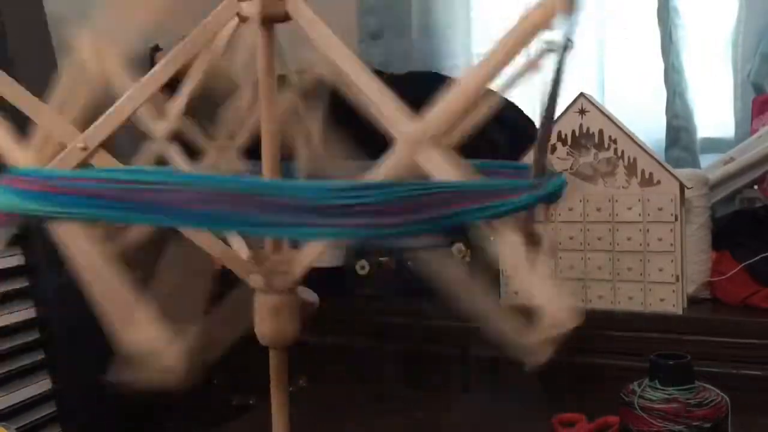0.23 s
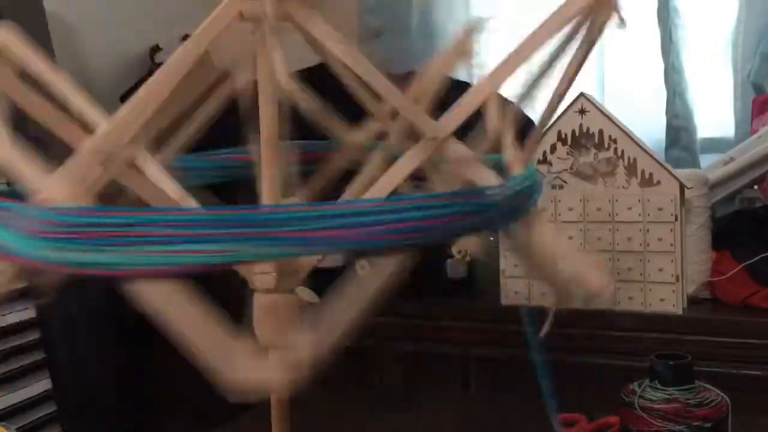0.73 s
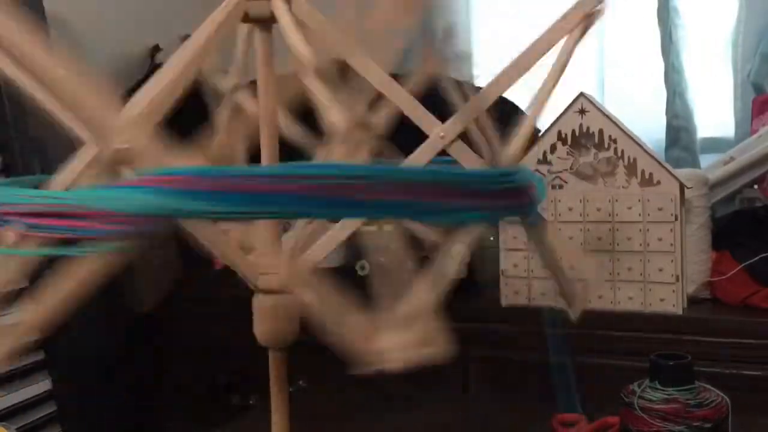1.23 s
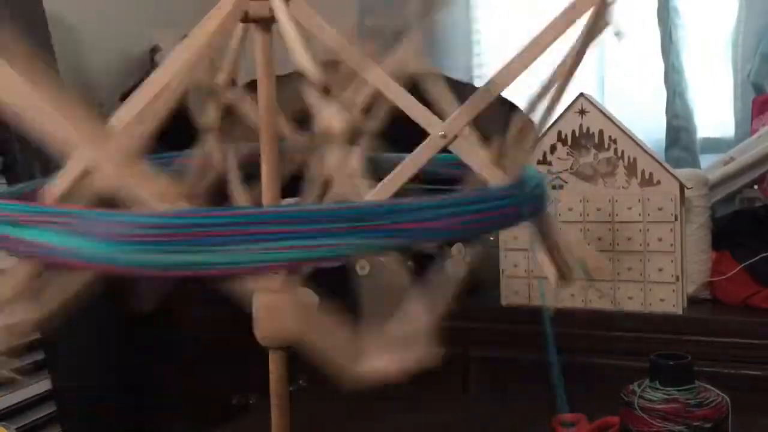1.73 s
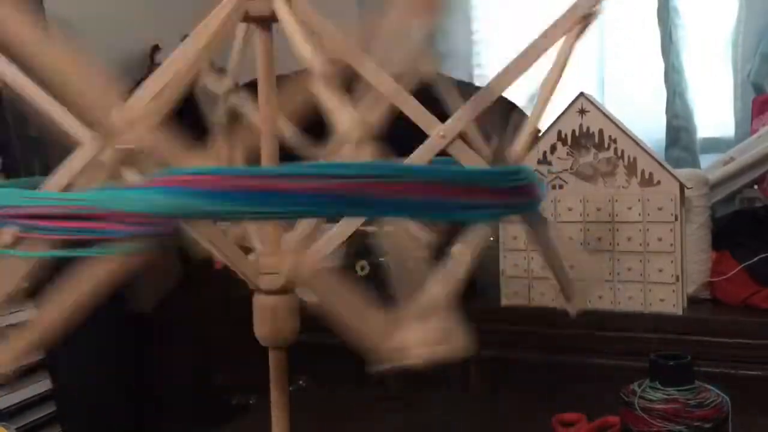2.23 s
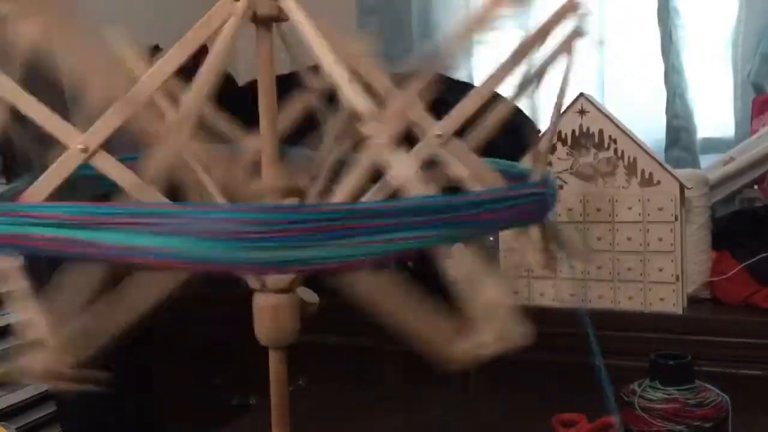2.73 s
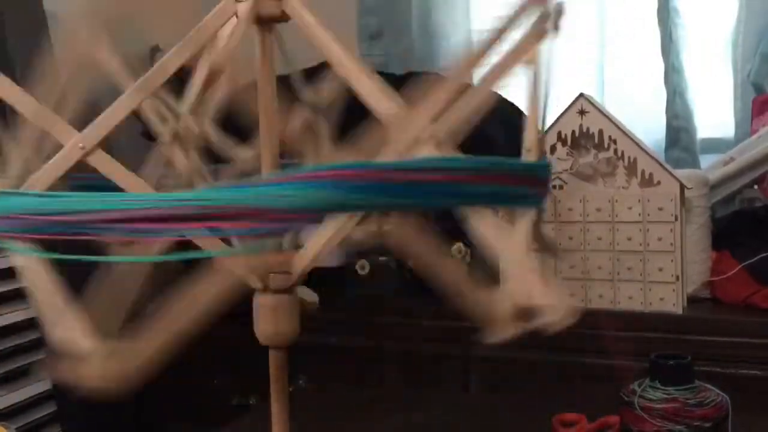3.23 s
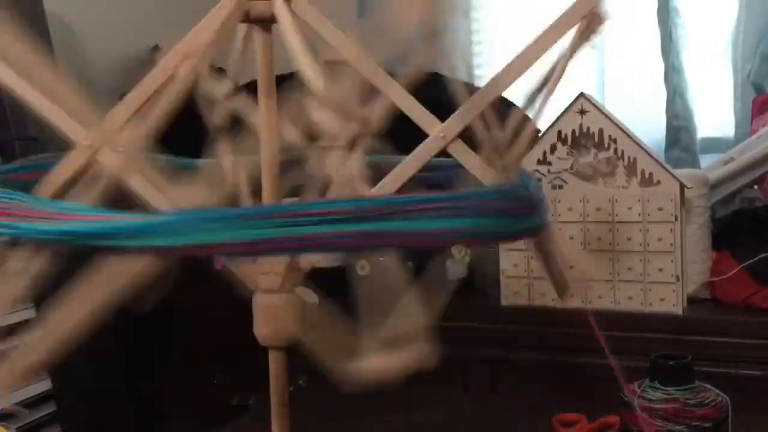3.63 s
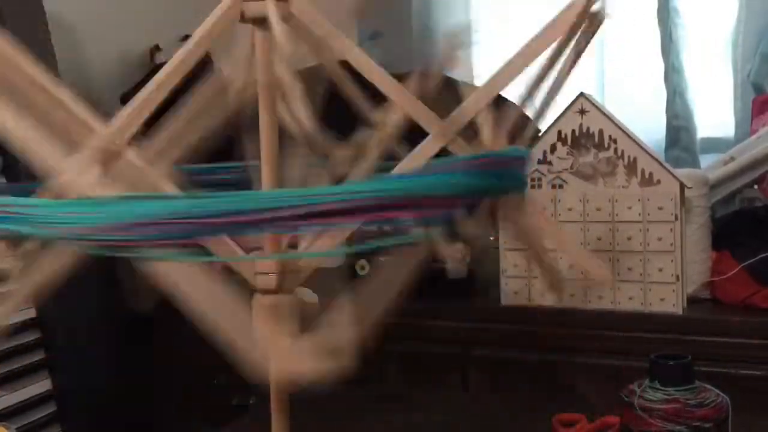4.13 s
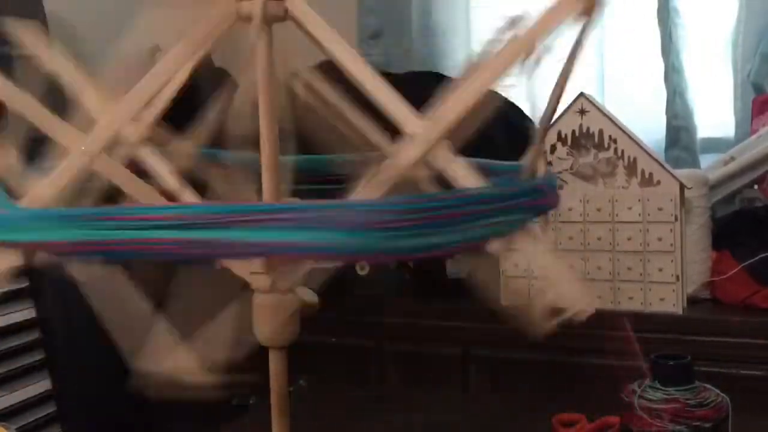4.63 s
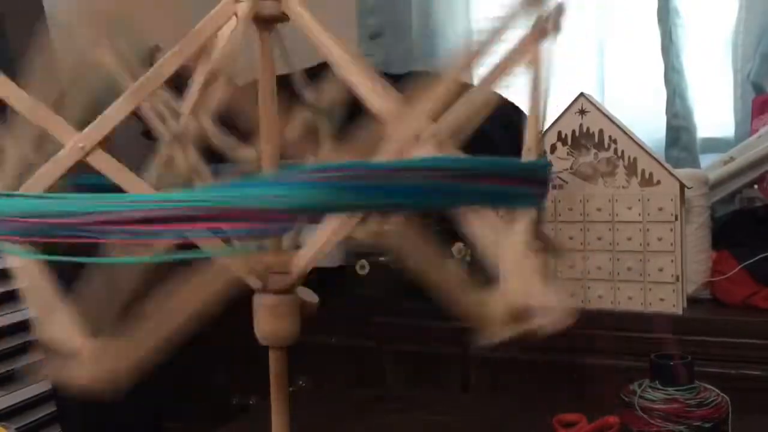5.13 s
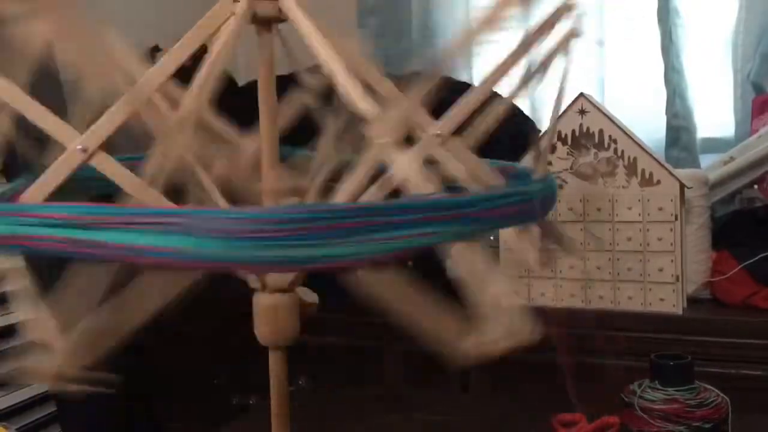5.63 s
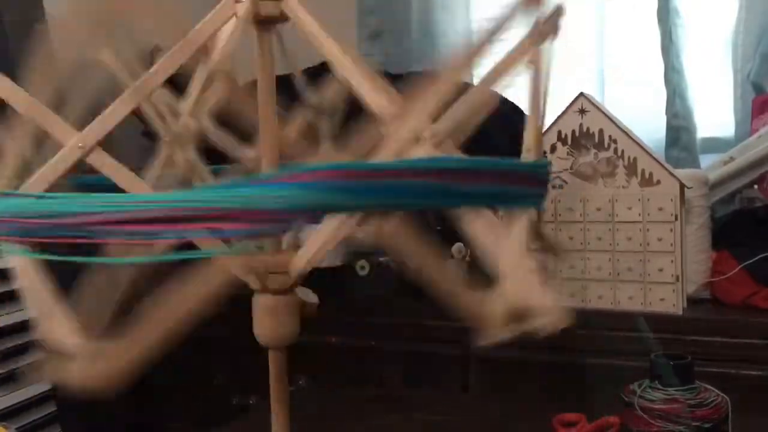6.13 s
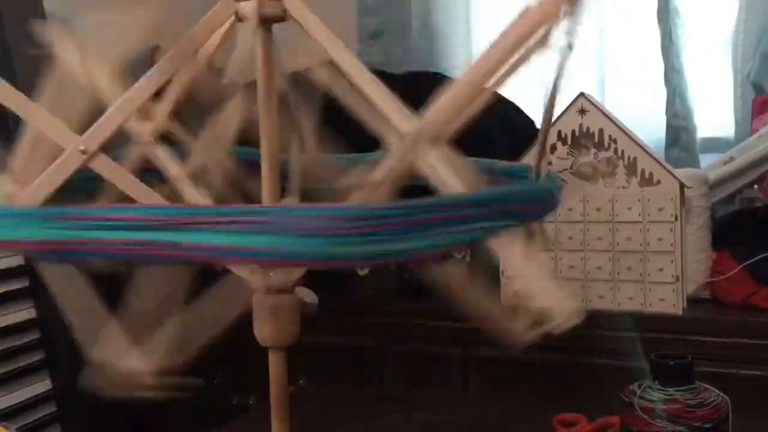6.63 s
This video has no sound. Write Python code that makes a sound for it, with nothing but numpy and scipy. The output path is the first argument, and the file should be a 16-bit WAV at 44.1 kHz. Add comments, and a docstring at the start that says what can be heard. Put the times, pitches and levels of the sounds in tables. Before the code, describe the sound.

Yarn is wound quickly off a spinning wooden swift. Hollow, grainy gear rattle pulses unevenly with very brief dips between pulls of the crank; soft bright swishes and small woody ticks run over it. The spindle rasps about once a turn. One hard clack with a short ringing clatter stands far above the rest near the middle. Dry, close indoor pickup with quiet room air.

```python
"""In a small room, a hand-cranked plastic winder pulls yarn off a turning wooden swift.
Loose gears, made of uneven tooth contacts, rattle in surges through resonances; filtered noise rumbles as the table.
The slats chatter as random short pings, the spindle chafes about once a turn as a raspy resonant noise,
and the yarn hisses, swishes and zips as bright noise.
Slack parts click and knock all along (noise bursts with ringing tones), and once there is a sharp, loud clack."""
import sys
import numpy as np
from scipy import signal
from scipy.fft import rfft, irfft
from scipy.io import wavfile
from scipy.ndimage import uniform_filter1d, map_coordinates

SR = 44100
rng = np.random.default_rng(int(sys.argv[2]) if len(sys.argv) > 2 else 0)


def master_out(mix):
    """Clip the mix to full scale and print it as 16-bit PCM to the path in sys.argv[1]."""
    frames = np.transpose(np.atleast_2d(mix))
    ceiling = np.clip(frames, -1, 1)
    pcm = np.round(ceiling * 32767).astype(np.int16)
    wavfile.write(sys.argv[1], SR, pcm)


N = 303849
TIME = np.arange(N) / SR   # seconds

# Long pulls of the hand on the crank, with brief stalls between: start t/s, end t/s
CRANK_PULLS = [(0.31, 0.99), (1.10, 1.90), (1.99, 2.13), (2.24, 3.01), (3.10, 4.01), (4.14, 6.01),
               (6.14, 7.0)]
# The swift's arms tug on the yarn and the rattle surges:
# peak t/s, length t/s, level/dB before SURGE_GAIN_DB (gears) or TABLE_SURGE_DB (table),
# housing tone level/dB relative to the surge level
RATTLE_SURGES = [(0.163, 0.025, -49.0, -1), (0.342, 0.06, -47.0, -2), (0.438, 0.096, -45.0, 0.5),
                 (0.534, 0.118, -44.5, 0), (0.641, 0.053, -43.0, -4), (0.722, 0.14, -46.5, -1),
                 (0.813, 0.068, -48.0, -5), (0.923, 0.083, -51.0, 4), (1.141, 0.081, -47.0, -3.5),
                 (1.207, 0.076, -48.5, 2.5), (1.283, 0.104, -46.5, -0.5), (1.444, 0.113, -47.0, -1),
                 (1.56, 0.135, -51.0, -1.5), (1.716, 0.108, -53.0, 1.5), (1.848, 0.109, -46.0, 1),
                 (2.066, 0.17, -50.0, 0.5), (2.214, 0.067, -53.0, 0), (2.305, 0.076, -51.0, 1.5),
                 (2.404, 0.128, -44.5, -1), (2.453, 0.099, -43.0, 0.5), (2.561, 0.145, -46.5, 0.5),
                 (2.685, 0.17, -47.5, -2.5), (2.822, 0.083, -44.0, -3), (3.133, 0.111, -46.5, -3),
                 (3.257, 0.127, -40.0, -2), (3.416, 0.068, -46.5, 1.5), (3.563, 0.064, -47.0, 2.5),
                 (3.699, 0.072, -46.0, -1.5), (3.839, 0.099, -45.0, -1), (3.979, 0.17, -52.0, 0.5),
                 (4.198, 0.17, -48.0, 1.5), (4.301, 0.097, -46.0, 3.5), (4.437, 0.109, -44.5, -4.5),
                 (4.565, 0.092, -46.5, -3.5), (4.787, 0.17, -50.5, -4), (5.041, 0.108, -50.0, -0.5),
                 (5.181, 0.12, -45.0, -3.5), (5.29, 0.128, -56.0, 6.5), (5.435, 0.17, -52.5, 0.5),
                 (5.655, 0.099, -46.5, -1), (5.77, 0.17, -47.5, -2), (5.99, 0.088, -54.5, 3),
                 (6.215, 0.17, -46.5, 3.5), (6.321, 0.128, -44.0, -1), (6.453, 0.126, -48.0, -1),
                 (6.613, 0.114, -47.0, 0.5), (6.727, 0.069, -47.5, 0), (6.8, 0.052, -53.0, 5),
                 (6.884, 0.082, -46.5, -3)]
# A strand peels off the skein and swishes through the guide:
# peak t/s, length t/s, level/dB before SWISH_GAIN_DB
YARN_SWISHES = [(0.328, 0.025, -62), (0.443, 0.048, -61.5), (0.636, 0.021, -56), (0.811, 0.11, -60.5),
                (0.939, 0.12, -62), (1.127, 0.116, -62), (1.277, 0.091, -56.5), (1.46, 0.074, -56),
                (1.578, 0.11, -60.5), (1.736, 0.12, -62), (1.868, 0.095, -54), (2.093, 0.11, -55.5),
                (2.439, 0.1, -72), (2.571, 0.079, -57.5), (2.714, 0.13, -62), (2.822, 0.18, -58.5),
                (3.126, 0.069, -54.5), (3.264, 0.15, -67), (3.417, 0.08, -57), (3.572, 0.09, -60),
                (3.703, 0.083, -60.5), (3.854, 0.069, -58.5), (3.987, 0.16, -62), (4.159, 0.12, -65.5),
                (4.297, 0.11, -57), (4.446, 0.13, -58.5), (4.565, 0.044, -59), (4.903, 0.069, -54.5),
                (5.055, 0.07, -55.5), (5.18, 0.053, -57), (5.499, 0.043, -63), (5.7, 0.16, -61),
                (5.995, 0.067, -63.0), (6.334, 0.123, -66), (6.606, 0.12, -63), (6.721, 0.057, -55.5),
                (6.88, 0.071, -53)]
# Yarn snagging and zipping free: t/s, level/dB before a common cut, pitch f/Hz
YARN_SNAGS = [(0.4353, -39.5, 8800), (0.5526, -40, 8670), (1.1155, -38, 9030), (1.5663, -32, 15500),
              (1.9574, -41, 8700), (2.2004, -35, 13200), (3.2287, -32, 7760), (4.1609, -32.5, 8850),
              (4.564, -36, 13400), (4.8868, -48, 14500), (5.0644, -40, 12700), (5.1744, -38, 13300),
              (6.5825, -37.5, 8700)]
# The spindle chafes about once a turn: start t/s, end t/s, level/dB
SPINDLE_CHAFES = [(0.64, 0.74, -55), (1.38, 1.47, -58), (2.62, 2.73, -55), (3.22, 3.34, -49.5),
                  (3.81, 3.89, -54), (4.41, 4.54, -55), (5.135, 5.215, -49), (5.68, 5.84, -53.5),
                  (6.325, 6.47, -53.5)]
# Slack parts clicking: t/s, overall level/dB, ring of the body relative level/dB,
# bright edge relative level/dB, the part's own pitch f/Hz (relative levels before a common trim)
SLACK_CLICKS = [(0.1579, -42, -6.5, -30, 4020), (0.243, -54, -2.5, -34, 1900),
                (0.3311, -35, -30, -19, 1860), (0.4344, -41.5, 1.5, -17, 1920), (0.4983, -46, 6, -35, 1170),
                (0.6175, -37, -25, -19, 3680), (0.632, -28, -15, -24, 1410), (0.7463, -43, -0.5, -27, 1410),
                (0.8054, -40.5, -2, -17, 1550), (0.9238, -48.5, 2, -16, 2057),
                (1.1174, -28, -22, -26, 2050), (1.2017, -35, -7.5, -16.5, 1470),
                (1.4147, -43.5, -1.5, -23, 1730), (1.493, -38, -8, -20, 1360),
                (1.8595, -36.5, -8.5, -19, 3920), (2.1211, -31, -21, -8, 2180),
                (2.2041, -34, -20, -9, 1940), (2.2967, -41.5, 2, -33, 1400),
                (2.3774, -28.5, -16, -22, 1640), (2.4174, -37.5, -1, -11, 2230),
                (2.4663, -43, -4, -19, 1490), (2.5376, -36.5, -17, -17, 1595),
                (2.6728, -35, -12, -29, 3550), (2.801, -32, -11.5, -29, 1700),
                (3.1936, -32.5, -17, -28, 1910), (3.2139, -29, -17, -27, 2110),
                (3.2819, -38.5, -14, -8, 1436), (3.684, -25, -19, -20.5, 2270),
                (3.9696, -37.5, -7.5, -11, 1120), (4.1614, -30, -26, -29, 1890),
                (4.2961, -39, -8, -24.5, 1420), (4.4004, -35, -3.5, -29, 1710),
                (4.5479, -38.5, -3, -18, 1610), (4.7178, -34, -13, -20, 1500),
                (4.7918, -37.5, -11, -15, 2040), (5.01, -36.5, -17, -28, 2290),
                (5.1362, -32.5, -22, -27, 2220), (5.634, -30, -25, -17, 2180),
                (5.7298, -34, -7.5, -20, 3310), (5.931, -39, -22, -21, 2060), (6.086, -52, -6, -34, 1310),
                (6.2789, -24, -16.5, -36, 1410), (6.3462, -40, -3, -31, 3420),
                (6.4822, -41.5, -8, -16, 1050), (6.5832, -34, -12, -26, 1610),
                (6.6416, -44.5, -4, -28, 1610), (6.7154, -33.5, -13.5, -11, 1720),
                (6.7915, -36.5, -8.5, -30, 1340), (6.846, -35.5, -17, -26, 2340)]
# The hard clack: t/s, overall level/dB
HARD_CLACK = [(2.8757, -11.5)]

# Tones rung by a blow: f/Hz, level/dB, time to fall by 60 dB t/s
STRUCK_TONES = [(190.8, -19, 0.48), (423, -16.5, 0.13), (519, -19, 0.089), (605, -6, 0.14), (723, 1, 0.14),
                (885, -7, 0.11), (1035, -13, 0.14), (1300, -38, .12), (1400, -7, 0.046),
                (1490, -12.5, 0.16), (1595, -25, .08), (1860, -7, 0.073), (2024, -4, 0.1),
                (2526, -7.5, 0.039), (2666, -20.5, 0.31), (3420, -10, 0.069), (5290, -22, 0.074),
                (13100, -42, .05), (14470, -38, .06)]
# Resonances of the hollow housing while the winder runs: f/Hz, width f/Hz, level/dB
HOUSING_TONES = [(319.8, 20, -3), (341.3, 15.6, 4), (432.3, 17.3, -0.5), (522, 27, -7), (610, 28, 3.5),
                 (747.3, 45, 2.5), (820, 93, -24)]
# Resonances of the gear wheels: f/Hz, width f/Hz, level/dB
GEAR_TONES = [(1145, 13, 9.5), (1410, 58, 10), (1610, 100, 3.5), (1984, 147, 13), (2060, 93, 7),
              (2560, 42, -51)]
# Rasp of the chafing spindle: f/Hz, width f/Hz, level/dB
CHAFE_TONES = [(3420, 90, 0), (5220, 160, -13)]

# Tone colour of each sound, as a spectrum; only the shape counts: f/Hz, level/dB
GEAR_SPECTRUM = [(150, -22.5), (300, -13), (800, 9), (1100, -13.5), (1500, 4.5), (2200, 9), (2900, -2.5),
                 (3600, -4), (4400, -6), (5500, -12.5), (7000, -14), (10000, -53), (16000, -13)]
HOLLOW_SPECTRUM = [(120, -18), (230, 2), (330, 4.5), (390, 7.5), (440, -28), (490, 0.5), (650, -0.5),
                   (950, -3.5), (1300, -3.5), (3000, -39)]
TABLE_SPECTRUM = [(20, -38), (33, -69), (44, -6.5), (56, 10), (73, -5.5), (92, 2.5), (115, -3.5),
                  (180, -2.5), (215, -17.5), (300, -6), (500, -20.5), (1500, -38)]
YARN_SPECTRUM = [(1500, 0), (4000, 8.5), (6800, 8), (8200, 0), (9800, 4.5), (10400, -14), (11200, 5.5),
                 (13400, 7), (14300, -3), (15700, -0.5)]
CLICK_SPECTRUM = [(100, -34), (400, 11), (1000, -18), (2000, 1), (3000, 3.5), (4000, 6.5), (5500, -12),
                  (8000, -17.5), (16000, -26)]
CLACK_SPECTRUM = [(25, -45), (45, -45), (200, -8), (300, -6), (480, -7), (800, -4.5), (1550, 4.5),
                  (2500, -0.5), (3000, -6.5), (3900, -3), (4700, -5.5), (5700, -3), (7300, -16.5),
                  (15500, -19.5)]
AIR_SPECTRUM = [(25, -39), (48, 6), (190, 0.5), (340, -2), (490, -13), (620, -7.5), (800, -13), (1400, -6),
                (2200, -8.5), (3500, -16), (6500, -19.5), (15500, -25)]

ROOM_T60_S, CUTOFF_HZ = 0.23, 15900
SPIN_UP_S, RUN_DOWN_S = .03, .05
# Even turning, and how far it sinks in a stall
RATTLE_DB, HISS_DB, STALL_DB = -57, -72.5, -15
RUNNING_HOLLOW_DB = -0.5   # housing tone relative to the rattle between surges
SURGE_GAIN_DB, SWISH_GAIN_DB = .5, 2
# The table follows the crank a little late, takes a share of each surge and booms after the clack
TABLE_DB, TABLE_LAG_S, TABLE_STALL_DB, TABLE_SURGE_DB = -53.5, 0.029, -14, -5
BOOM_DB, BOOM_T60_S = -39.5, 0.81


def from_db(db):
    """Turn decibels into a gain."""
    return 10 ** (np.asarray(db) / 20)


def rms_one(x):
    """Scale a sound to an average (rms) strength of 1."""
    return x / np.sqrt(np.mean(x ** 2) + 1e-20)


def level_out(x, window):
    """Even out the strength of a sound over a sliding window of samples."""
    return x / np.sqrt(uniform_filter1d(x ** 2, size=window))


def drift(rate):
    """Smooth random wandering with rms 1; rate is in random points per second."""
    points, coarse = rng.standard_normal(4096), TIME[::24]
    wander = map_coordinates(points, [coarse * rate], order=2, mode="wrap")
    return rms_one(np.interp(TIME, coarse, wander))


def colour(x, spectrum, size=8192):
    """Filter with the given spectrum, never ahead of its input; white noise keeps its power."""
    hz, db = np.transpose(spectrum)
    grid = np.maximum(np.arange(size // 2 + 1) * SR / size, 1)
    wanted_db = np.interp(np.log(grid), np.log(hz), db)
    # folding the cepstrum makes the filter minimum-phase: its energy comes as early as possible
    cepstrum = irfft(np.log(from_db(wanted_db)))
    cepstrum[1:size // 2] *= 2
    cepstrum[size // 2 + 1:] = 0
    response = irfft(np.exp(rfft(cepstrum)))
    return signal.fftconvolve(x, response / np.linalg.norm(response))[:len(x)]


def resonate(x, tones):
    """Resonances side by side, with alternating signs; rms 1."""
    out = 0
    for k, (hz, width, db) in enumerate(tones):
        r = np.exp(-np.pi * width / SR)
        feedback = [1, -2 * r * np.cos(2 * np.pi * hz / SR), r * r]
        tone = (1 - r * r) * signal.lfilter([1, 0, -1], feedback, x)
        out = out + (-1) ** k * from_db(db) * tone
    return rms_one(out)


def restless(x, low_hz, high_hz, depth_db, rate, count):
    """A travelling contact favours ever other resonances: each band swells by its own chance; rms 1."""
    out, edges = 0, np.geomspace(low_hz, min(high_hz, .45 * SR), count + 1)
    for low, high in zip(edges, edges[1:]):
        band = signal.sosfilt(signal.butter(1, [low, high], "band", fs=SR, output="sos"), x)
        out = out + band * from_db(depth_db * drift(rate))
    return rms_one(out)


def fade(t, t60):
    """Die away by 60 dB in t60 seconds."""
    return np.exp(-np.log(1000) * t / t60)


def add(track, s, sound):
    """Mix a sound in at time s."""
    start = round(s * SR)
    track[start:start + len(sound)] += sound[:N - start]


def crack(t, crack_t60, tail_db, tail_t60):
    """A contact: a brief noise burst, then a noise tail for the crowd of small resonances left ringing."""
    return rng.standard_normal(len(t)) * (fade(t, crack_t60) + from_db(tail_db) * fade(t, tail_t60))


def ring(t, spread_db, detune):
    """Struck tones; load and contact point give each its own strength and pitch in every blow."""
    hz, db, t60 = np.transpose(STRUCK_TONES)[:, :, None]
    strength = from_db(db + spread_db * rng.standard_normal(db.shape)) * rng.choice([-1, 1], db.shape)
    # the blow's energy is only shared out
    strength = strength * np.linalg.norm(from_db(db)) / np.linalg.norm(strength)
    pitch = hz * np.exp(detune * rng.standard_normal(hz.shape))
    return np.sum(strength * np.sin(2 * np.pi * pitch * t) * fade(t, t60), axis=0)


def cranking(stall_db, lag_s=0):
    """Gain of the crank: 1 during a pull, sinking to a remnant in the stalls."""
    t = TIME - lag_s
    turning = 0
    for start, end in CRANK_PULLS:
        rise, fall = (t - start) / SPIN_UP_S, (end - t) / RUN_DOWN_S + .5
        turning = turning + np.clip(np.minimum(rise, fall), 0, 1)
    return np.maximum(turning, from_db(stall_db))


def swells(rows):
    """Gain of bell-shaped swells (peak t/s, length t/s, level/dB), whose powers add."""
    coarse = TIME[::40]
    power = 0
    for s, length, db in rows:
        bell = np.exp(-(2 * (coarse - s) / length) ** 2)
        power = power + (from_db(db) * bell) ** 2
    return np.interp(TIME, coarse, np.sqrt(power))


def air():
    """Quiet air of the room: steady coloured noise."""
    return from_db(-63) * colour(rng.standard_normal(N), AIR_SPECTRUM)


def room(x, wet_db, wall_hz):
    """Scattered reflections of a furnished room, dulled by the walls."""
    t = TIME[:SR // 2]
    tail = rng.standard_normal(len(t)) * fade(t, ROOM_T60_S) * (t > .004)
    walls = signal.butter(1, min(wall_hz, SR / 3), fs=SR, output="sos")
    tail = signal.sosfilt(walls, tail / np.linalg.norm(tail))
    return x + from_db(wet_db) * signal.fftconvolve(x, tail)[:N]


def table():
    """The table top rumbles under the clamp: low noise that follows the crank and booms after the clack."""
    surges = from_db(TABLE_SURGE_DB) * swells([row[:3] for row in RATTLE_SURGES])
    driven = np.hypot(from_db(TABLE_DB) * cranking(TABLE_STALL_DB, TABLE_LAG_S), surges)
    after_clack = sum((TIME > s) * fade(np.abs(TIME - s), BOOM_T60_S) for s, _ in HARD_CLACK)
    boom = from_db(BOOM_DB) * after_clack
    # the crank feeds the rumble evenly
    steady = level_out(colour(rng.standard_normal(N), TABLE_SPECTRUM), 6000)
    low_cut = signal.butter(4, 36, "high", fs=SR, output="sos")
    return signal.sosfilt(low_cut, np.hypot(driven, boom) * steady)


def yarn():
    """Fibres catch and slip in the guide: a grained hiss of shifting colour."""
    sliding = np.hypot(from_db(HISS_DB) * cranking(STALL_DB), from_db(SWISH_GAIN_DB) * swells(YARN_SWISHES))
    fibres = rng.standard_normal(N) * from_db(3.36 * drift(400))
    hiss = restless(fibres, low_hz=2870, high_hz=16700, depth_db=6.5, rate=29, count=18)
    return sliding * rms_one(colour(hiss, YARN_SPECTRUM))


def snags():
    """A caught fibre slips free with a short, bright zip of resonant noise."""
    out, t = np.zeros(N), TIME[:SR // 10]
    for s, db, hz in YARN_SNAGS:
        zip_noise = resonate(rng.standard_normal(len(t)), [(hz, 700, 0)])
        shape = fade(t, 0.04) * (1 - fade(t, 0.0024))   # slower fall, quick rise
        add(out, s, from_db(db - 10.5) * zip_noise * shape)
    return out


def spindle():
    """Stick and slip in the bearing: a ragged, raspy note that swells and stops while the tight spot passes."""
    pressure = 0
    for start, end, db in SPINDLE_CHAFES:
        corners = [start - .025, start + .025, end - .025, end + .025]
        pressure = pressure + from_db(db) * np.interp(TIME, corners, [0, 1, 1, 0])
    # friction feeds the note steadily
    held = level_out(resonate(rng.standard_normal(N), CHAFE_TONES), 900)
    return pressure * rms_one(held * from_db(3.2 * drift(130)))


def clicks():
    """Slack parts knock: a woody tick at the part's own pitch, a bright edge and the ring of the body."""
    out, t = np.zeros(N), TIME[:SR // 4]
    for s, db, body_db, edge_db, hz in SLACK_CLICKS:
        burst = crack(t, crack_t60=0.0054, tail_db=-8.0, tail_t60=0.1)
        burst = burst + from_db(7) * (t == 0)   # the first touch is a single sharp push
        tick = from_db(-8.5) * colour(burst, CLICK_SPECTRUM)
        own_fade = from_db(-8.0) * fade(t, 0.018) + from_db(-13.0) * fade(t, 0.077)
        own_tone = np.sin(2 * np.pi * hz * t) * own_fade
        edge = from_db(edge_db + 2.0) * colour(burst, YARN_SPECTRUM)
        body = from_db(body_db + 3) * ring(t, spread_db=4.5, detune=0.0347)
        add(out, s, from_db(db) * (tick + own_tone + edge + body))
    return out


def clack():
    """One hard blow: a bright snap, a short clatter and all the struck tones ringing."""
    out, t = np.zeros(N), TIME[:SR // 2]
    for s, db in HARD_CLACK:
        snap = colour(crack(t, crack_t60=.025, tail_db=-16, tail_t60=.07), YARN_SPECTRUM)
        clatter = colour(crack(t, crack_t60=0.062, tail_db=-17, tail_t60=0.35), CLACK_SPECTRUM)
        body = ring(t, spread_db=2, detune=0)
        blow = from_db(-10.5) * snap + from_db(-6.5) * clatter + from_db(-11) * body
        add(out, s, from_db(db) * blow)
    return out


def slats(per_s, low_hz, high_hz, uneven_db, tilt_db, count=3000):
    """Small wooden contacts at random: short fading pings, tilted in level per octave; rms 1."""
    out, t = np.zeros(N), TIME[:SR // 30]
    decay = fade(t, .028)
    for s, place, size, phase in rng.random((count, 4)) * [count / per_s, 1, 1, 2 * np.pi]:
        if s < TIME[-1]:
            octaves = place * np.log2(high_hz / low_hz)
            ping = np.sin(2 * np.pi * low_hz * 2 ** octaves * t + phase) * decay
            add(out, s, from_db(uneven_db * size + tilt_db * octaves) * ping)
    return rms_one(out)


def teeth(effort_db, per_s, wobble, uneven_db, rub):
    """Teeth meet unevenly, faster when driven harder, and slide between the contacts."""
    harder_db = effort_db - np.median(effort_db)
    speed = per_s * from_db(.2 * harder_db) * np.exp(wobble * drift(90))
    # a contact falls wherever the running count of teeth passes a whole number
    meets = np.diff(np.floor(np.cumsum(speed) / SR), prepend=0)
    sizes = from_db(uneven_db * np.clip(rng.standard_normal(N), -2, 2)) * rng.choice([-1, 1], N)
    force = rms_one(meets * sizes) + rub * rng.standard_normal(N)
    return level_out(force, 2400)


def gears():
    """Teeth rattle in the plastic wheels and ring the hollow housing; the same pull makes the slats chatter."""
    running = from_db(RATTLE_DB) * cranking(STALL_DB)
    surges = from_db(SURGE_GAIN_DB) * swells([row[:3] for row in RATTLE_SURGES])
    effort = np.hypot(running, surges)
    hollow_surges = swells([(s, length, db + tone_db) for s, length, db, tone_db in RATTLE_SURGES])
    hollow = np.hypot(from_db(RUNNING_HOLLOW_DB) * running, hollow_surges)

    force = teeth(20 * np.log10(effort + 1e-6), per_s=230, wobble=.3, uneven_db=4.0, rub=0.38)
    moving = restless(force, low_hz=176.0, high_hz=8510, depth_db=4.0, rate=32, count=20)
    wheels = from_db(-4.0) * colour(moving, GEAR_SPECTRUM) + from_db(-3.5) * resonate(moving, GEAR_TONES)
    hollow_noise = rms_one(colour(moving, HOLLOW_SPECTRUM))
    housing = resonate(moving, HOUSING_TONES) + from_db(-2.5) * hollow_noise
    chatter = from_db(-6) * slats(per_s=230, low_hz=1121, high_hz=4377, uneven_db=14, tilt_db=-4.5)
    return effort * (wheels + chatter) + hollow * housing


def scene():
    """The winder and the swift in the room, with the table's rumble and quiet air."""
    winding = gears() + yarn() + snags() + spindle() + clicks() + clack()
    return (room(winding, wet_db=-10.5, wall_hz=5800) + table() + air())[None]


def record(dry):
    """Cut the top steeply with an elliptic low-pass filter."""
    return signal.sosfilt(signal.ellip(10, .2, 80, CUTOFF_HZ, fs=SR, output="sos"), dry)


dry = scene()
out = record(dry)
master_out(out)
```